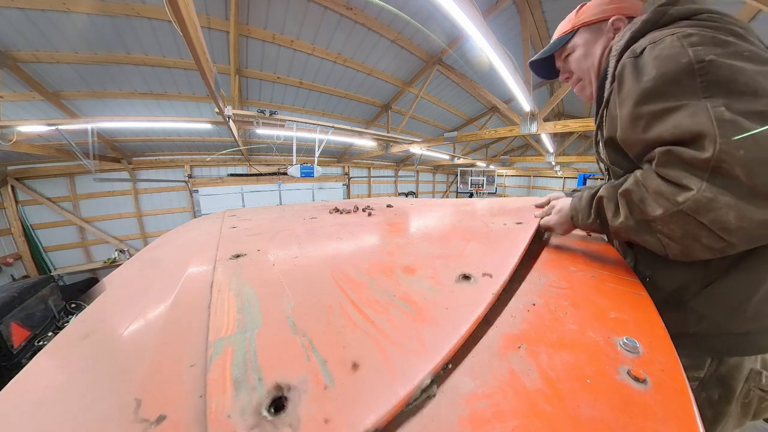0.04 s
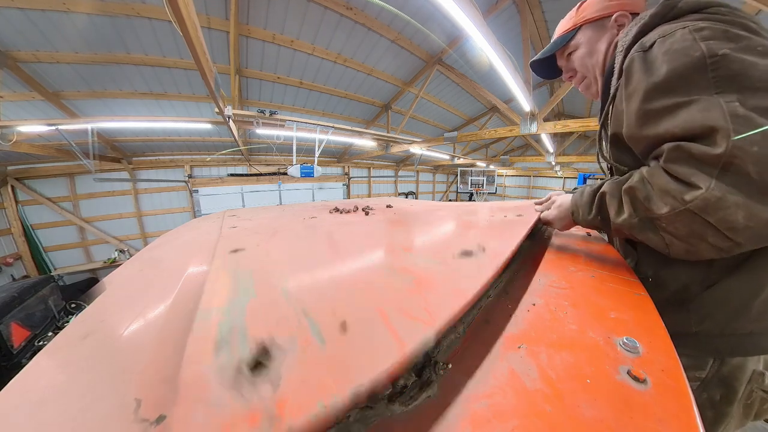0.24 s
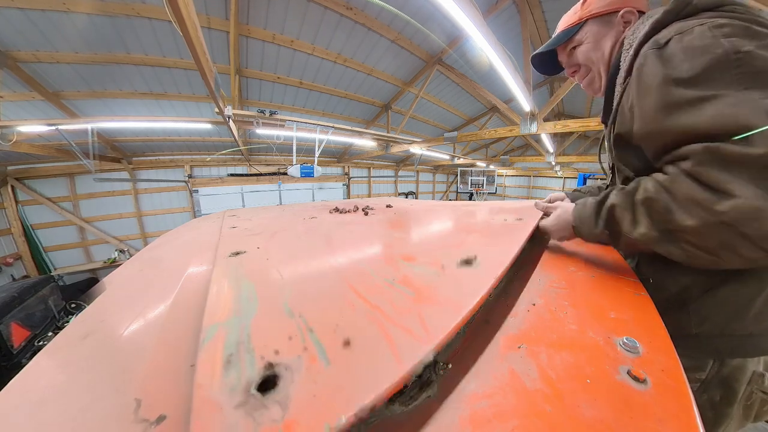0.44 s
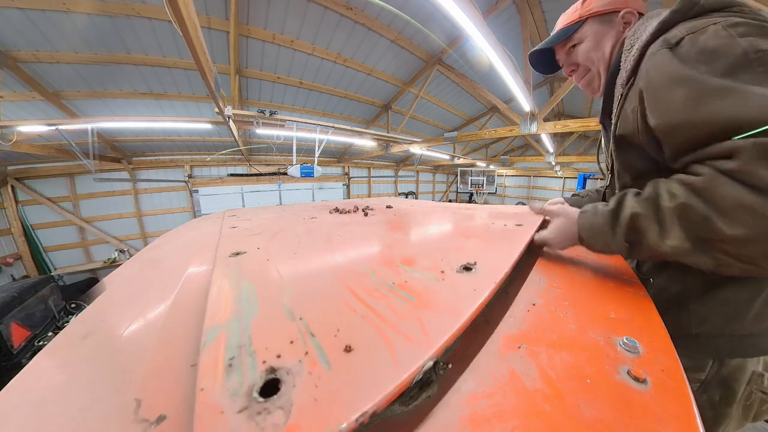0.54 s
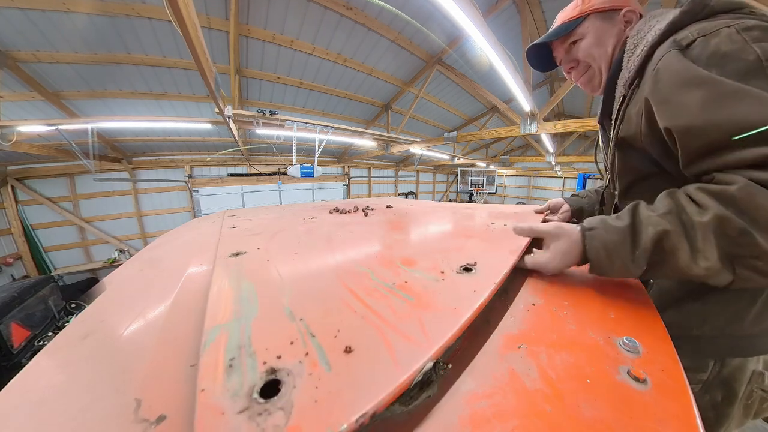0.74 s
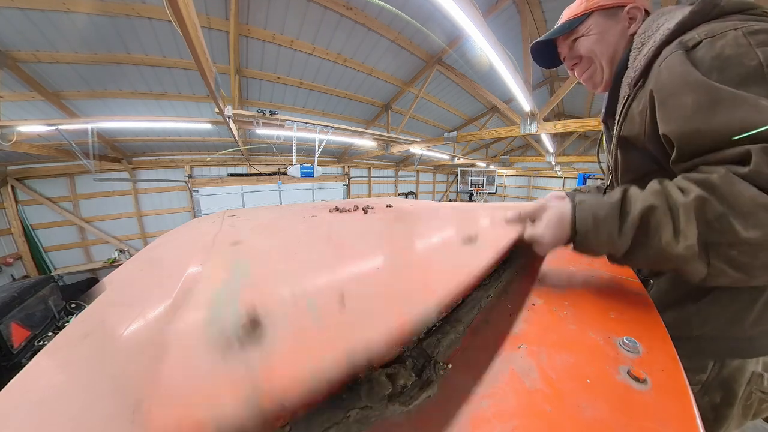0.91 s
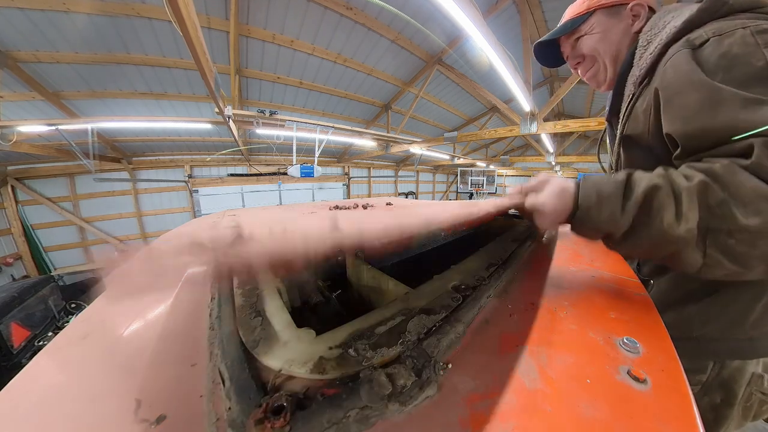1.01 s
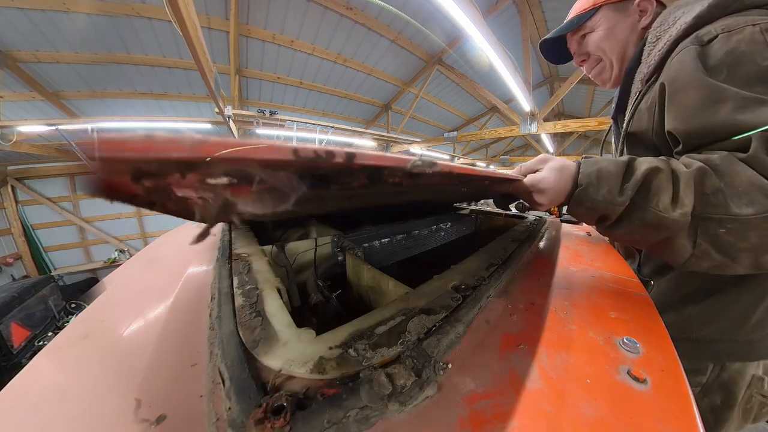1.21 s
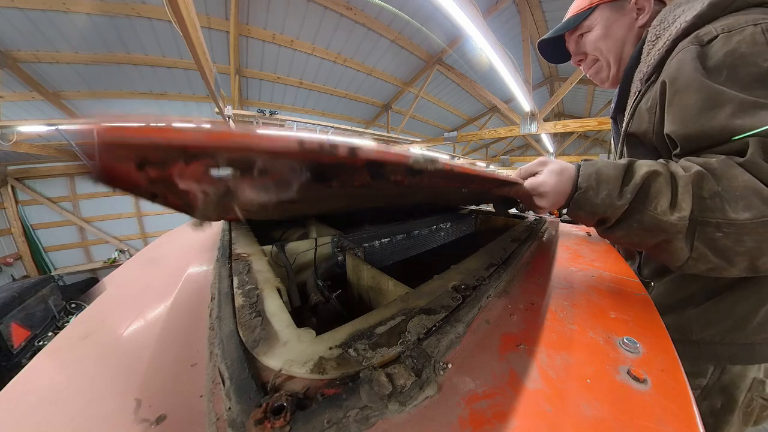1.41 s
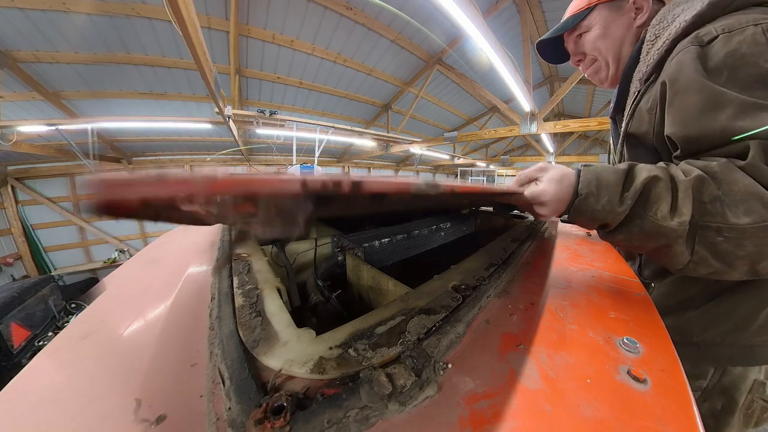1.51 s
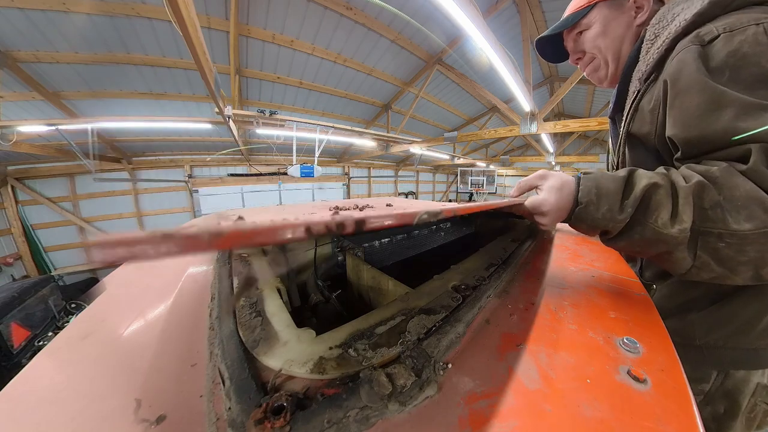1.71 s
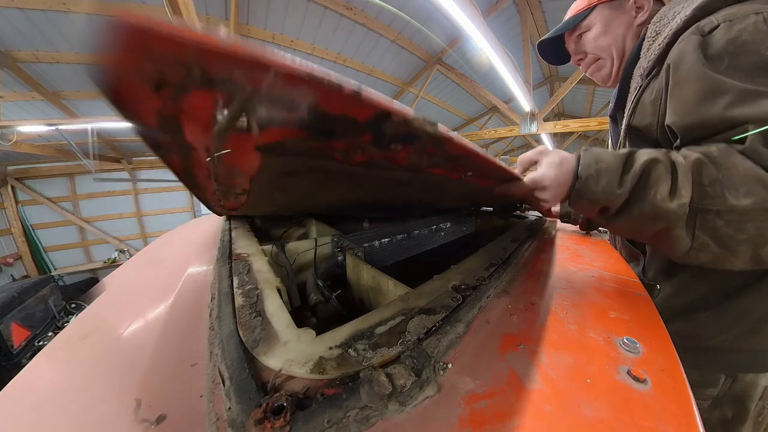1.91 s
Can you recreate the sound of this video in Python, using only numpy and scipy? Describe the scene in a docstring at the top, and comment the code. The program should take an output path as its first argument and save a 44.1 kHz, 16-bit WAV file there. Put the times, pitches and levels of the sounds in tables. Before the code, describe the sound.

A sheet-metal panel gives a faint creak, then breaks loose with a very loud, distorted crack and thump of air, scrapes and rattles on its seal, and wobbles low, close to the microphone in a large shed.

```python
"""Prying off a roof panel

A sheet-metal roof panel is pried off a tractor cab inside a large shed, close to the microphone.
It creaks, snaps loose in three cracks with a push of air, then scrapes and rattles along its seal.
Snaps are noise bursts that shake the panel's modes; buckles are sagging sines; rubbing is coloured noise.
The lifted panel hangs while its lowest modes beat and die away over the shed's hiss."""
import sys
import numpy as np
from scipy import signal
from scipy.fft import rfft, irfft
from scipy.io import wavfile
from scipy.ndimage import uniform_filter1d, minimum_filter1d

SR = 44100
rng = np.random.default_rng(int(sys.argv[2]) if len(sys.argv) > 2 else 0)


def unload_audio(sound):
    """Save the sound as a 16-bit wav file, at the path given as the first command line argument."""
    columns = np.transpose(np.atleast_2d(sound))
    # keep every value between -1 and 1, then stretch to whole-number steps
    steps = np.round(np.clip(columns, -1, 1) * 32767)
    wavfile.write(sys.argv[1], SR, steps.astype(np.int16))


def voltage_ratio(decibels):
    """Convert decibels (scalar or array-like) to amplitude ratios, 20 dB per decade."""
    exponent = np.asarray(decibels, float) / 20
    return 10 ** exponent


N = 85995  # length in samples


def rms_one(x):
    """Scale to unit rms."""
    return x / np.sqrt(np.mean(x ** 2) + 1e-20)


def in_time(rows):
    """Turn a curve of (time_s, level_db) into a gain for every sample."""
    time_s, level_db = np.transpose(rows)
    return voltage_ratio(np.interp(np.arange(N) / SR, time_s, level_db))


def coloured(x, spectrum):
    """Shape the spectrum by (pitch_hz, level_db), with almost nothing outside it; rms 1."""
    hz, db = np.transpose(spectrum)
    f = np.arange(N // 2 + 1) * SR / N + 1  # 1 Hz up, so that the log exists
    gain_db = np.interp(np.log(f), np.log(hz), db, left=-90, right=-90)
    return rms_one(irfft(rfft(x) * voltage_ratio(gain_db), N))


def drift(rate_hz):
    """Random wandering, mostly slower than rate_hz, with rms 1."""
    r = np.exp(-2 * np.pi * rate_hz / SR)
    white = rng.standard_normal(N + SR)  # the first second only settles the filter
    return rms_one(signal.lfilter([1], [1, -2 * r, r * r], white)[SR:])


def ring(clicks, hz, t60_s):
    """A resonance: a unit click sets a sine of height about 1 ringing, 60 dB down after t60_s."""
    r, w = voltage_ratio(-60 / (t60_s * SR)), 2 * np.pi * hz / SR
    return signal.lfilter([0, np.sin(w)], [1, -2 * r * np.cos(w), r * r], clicks + 1e-18)


# Colour of the hiss in the shed: pitch_hz, level_db (per Hz, relative)
SHED_COLOUR = [(20, -14.5), (40, -5), (100, -18.5), (200, -21.5), (260, -24), (330, 0.5), (600, -7),
               (1050, -0.5), (1400, -4.5), (2800, -7.5), (3600, -19), (4100, -32), (4700, -28.5),
               (5600, -33.5), (7300, -30.5), (8600, -41.5), (10000, -79)]
SHED_DB = -53


def shed_hiss():
    """Coloured noise whose level wavers by about 1 dB."""
    hiss = coloured(rng.standard_normal(N), SHED_COLOUR)
    return voltage_ratio(SHED_DB) * voltage_ratio(drift(46)) * hiss


# Loudness of the panel rubbing on its seal: time_s, level_db
SCRAPE_LEVEL = [(0, -55.5), (.065, -56), (.08, -48), (.15, -52), (.24, -46.5), (.3, -37.5), (.4, -39.5),
                (.55, -35.5), (.7, -35), (.87, -42), (1.03, -49.5), (1.3, -58), (1.48, -61.5),
                (1.54, -54.5), (1.62, -59.5), (1.77, -57), (1.87, -57.5), (1.95, -60.5)]
# Colour of the rubbing: pitch_hz, level_db (per Hz, relative)
SCRAPE_COLOUR = [(290, -31), (500, -0.5), (737, -3.5), (890, -9.5), (1230, -5.5), (1710, -13.5), (1960, -7),
                 (2190, -15), (2960, -7), (3530, -13.5), (4100, -15), (4710, -11), (5500, -18), (6700, -24),
                 (7780, -24.5), (8820, -31), (10000, -86), (13000, -105), (22000, -120)]
# Fine grit above 6 kHz against the rest of the scrape: time_s, level_db
GRIT = [(0, 0.5), (.25, 11), (.45, 7), (.7, -5), (.95, -7.5), (1.4, -1), (1.95, 2)]


def scrape():
    """Rubbing is dense uneven grains on a hiss; its finest grit swells, thins out and returns."""
    grains = rng.standard_normal(N) * (1 + 2.4 * (rng.random(N) < 0.03))
    rubbing = coloured(grains, SCRAPE_COLOUR)
    high = signal.butter(3, 6000, "high", fs=SR, output="sos")
    fine = signal.sosfiltfilt(high, rubbing)
    unsteady = voltage_ratio(-0.5 * drift(71))
    return in_time(SCRAPE_LEVEL) * unsteady * (rubbing + (in_time(GRIT) - 1) * fine)


# Loudness of the loose edge knocking on the frame: time_s, level_db
RATTLE_LEVEL = [(0, -83), (.065, -57.5), (.09, -44), (.16, -44.5), (.24, -31.5), (.3, -24.5), (.35, -34.5),
                (.43, -29.5), (.6, -30), (.69, -30.5), (.84, -35), (.95, -43.5), (1.15, -49.5),
                (1.4, -66.5), (1.6, -59), (1.72, -49.5), (1.8, -50.5), (1.87, -67), (1.95, -67.5)]
# Colour of the knocking: pitch_hz, level_db (per Hz, relative)
RATTLE_COLOUR = [(41, -19), (70, -3), (107, -1.5), (128, -5), (275, -2), (442, -7.5), (737, -30.5),
                 (891, -51.5), (1200, -30), (1560, -61.5), (2640, -120)]
KNOCKS_PER_S, KNOCK_SPREAD_DB = 800, 1.5
SWING_GATE = 0.25  # how much the swing changes the strength of the knocks


def rattle(shape):
    """Random knocks, stronger at the top of each swing, ring short low resonances."""
    sizes = voltage_ratio(KNOCK_SPREAD_DB * np.minimum(rng.exponential(1, N), 4))
    sizes = sizes * rng.choice([-1, 1], N)
    happens = rng.random(N) < KNOCKS_PER_S / SR
    knocks = sizes * happens * np.maximum(1 + SWING_GATE * shape, 0.05)
    pitches_hz = np.geomspace(70, 1200, 14)
    dealt = rng.integers(0, 14, N)  # each knock goes to one resonance
    rings = np.zeros(N)
    for k, hz in enumerate(pitches_hz):
        rings += ring(knocks * (dealt == k), hz, 12.7 / hz) * np.sqrt(hz)
    return in_time(RATTLE_LEVEL) * coloured(rings, RATTLE_COLOUR)


# Snaps of the sheet: start_s, level_db (peak), centre_hz, t60_s,
# ring_db (how strongly the panel rings, against the snap)
SNAPS = [(0.071, -33.5, 3280, 0.018, -4), (.071, -42, 600, 0.053, -32), (0.0701, -27.5, 7760, 0.022, -13.5),
         (0.217, -28.5, 1180, 0.015, -27), (.2220, -24.5, 1816, 0.0043, -14), (0.228, -37, 6030, 0.007, -9),
         (.2416, 10, 1500, .006, -16), (.2418, 9, 2700, .005, -30), (.2419, 8, 950, .012, -11),
         (.2426, 7, 2200, .006, -30), (.2419, -4, 6000, .008, -30), (0.245, -16, 5350, 0.055, -39),
         (.247, -15.5, 2410, 0.064, -20), (.2525, -12, 1120, 0.013, -13.5),
         (0.2538, -14.5, 1900, 0.025, -26), (.262, -14, 880, 0.012, -27),
         (0.2596, -9.5, 5400, 0.015, -33.5), (0.2623, -14, 5650, 0.0084, -19),
         (0.2793, -3.5, 5660, 0.015, -13), (0.2786, -8.5, 3300, 0.031, -23),
         (.28, -11.5, 946, 0.016, -22.5), (0.284, -16.5, 3480, 0.034, -11), (0.332, -29, 5600, 0.033, -19),
         (0.378, -22.5, 2100, 0.01, -18), (0.409, -29, 4900, 0.045, -43), (.4405, -22, 950, 0.059, -15),
         (.4405, -28, 2300, .03, -20.5), (.411, -30.5, 1700, .02, -21), (.839, -24.5, 2100, 0.028, -28),
         (.8395, -26.5, 3840, 0.033, -16), (0.841, -33, 5500, 0.014, -11), (1.058, -50, 6500, 0.0092, -20)]
# Modes of the panel: pitch_hz, level_db (relative), t60_s
PANEL = [(200, -16, 0.06), (281.3, -3.5, 0.11), (404, 3.5, 0.091), (456, 0, 0.059), (600, 8.5, 0.041),
         (670, -5, 0.049), (925, -20, 0.04), (950, -7.5, 0.041), (1020, 7.5, 0.035), (1240, -1, 0.0057),
         (1590, -4.5, 0.029), (1766, -4.5, 0.017), (2430, 9, 0.0071), (2790, 1, 0.013), (2900, -11, 0.034)]
SNAP_OCTAVES = 1.3  # width of the noise band
BEND_SHARE = 0.062  # the bent sheet detunes its modes from snap to snap by up to this share
SHUDDER_T60_S = 0.012  # how long a snap shakes the modes


def snaps():
    """Each snap is a dying burst of noise around its centre, and a short shudder that rings the panel."""
    length = 4410
    t = np.arange(length) / SR
    out = np.zeros(N + SR)
    for start_s, level_db, centre_hz, t60_s, ring_db in SNAPS:
        white = rng.standard_normal(length)
        edges = centre_hz * 2 ** (np.array([-0.5, 0.5]) * SNAP_OCTAVES)
        edges = np.clip(edges, 50, 0.45 * SR)
        burst = white * voltage_ratio(-60 * t / t60_s) + 4.0 * (t == 0)  # a click leads the noise
        band = signal.sosfilt(signal.butter(3, edges, "band", fs=SR, output="sos"), burst)
        shudder = white[::-1] * voltage_ratio(-60 * t / SHUDDER_T60_S)
        shudder = shudder / np.sqrt(np.sum(shudder ** 2))
        body = np.zeros(length)
        for mode_hz, mode_db, mode_t60_s in PANEL:
            uneven_db = rng.normal(0, 3.3)  # every snap excites the modes differently
            bend = 1 + BEND_SHARE * rng.uniform(-0.91, 1)
            body += voltage_ratio(mode_db + uneven_db) * ring(shudder, mode_hz * bend, mode_t60_s) / 2
        i = int(start_s * SR)
        out[i:i + length] += voltage_ratio(level_db) * (band / abs(band).max() + voltage_ratio(ring_db) * body)
    return out[:N]


ECHO_DB, ECHO_T60_S = -29, 0.14


def shed_echo(x):
    """The shed answers with a diffuse tail of dying noise, starting after 4 ms."""
    t = np.arange(SR // 2) / SR
    tail = rng.standard_normal(len(t)) * voltage_ratio(-60 * t / ECHO_T60_S) * (t > 0.004)
    tail = tail / np.sqrt(np.sum(tail ** 2))
    return voltage_ratio(ECHO_DB) * signal.fftconvolve(x, tail)[:N]


# The sheet buckles and pushes air: start_s, level_db, pitch_hz (at the start), t60_s
BUCKLES = [(0.074, -28.5, 233, 0.036), (0.175, -26, 113, 0.055), (0.182, -16.5, 178, 0.034),
           (0.226, -35, 300, 0.036), (0.2417, -3.5, 254, 0.028), (0.2421, 3, 396, 0.0279),
           (0.2492, -4, 111, 0.021), (0.2689, -8.5, 200, 0.011), (0.26, 4.5, 157.3, 0.0156),
           (0.2798, 4, 155, 0.034), (0.29, 0, 45.1, 0.056), (0.439, -20, 250, 0.017),
           (0.4456, -20, 185, 0.027), (0.455, -16, 232, 0.028), (0.46, -23, 130, .04),
           (0.587, -18, 172, 0.093), (1.937, -38, 99.6, 0.18)]
SAG_S = 0.014  # the pitch of a buckle has halved after this time


def buckles():
    """Each buckle is a low, heavily damped swing of pressure whose pitch sags."""
    t = np.arange(SR // 5) / SR
    out = np.zeros(N + SR)
    for start_s, level_db, hz, t60_s in BUCKLES:
        cycles = hz * SAG_S * np.log1p(t / SAG_S)
        i = int(start_s * SR)
        out[i:i + len(t)] += voltage_ratio(level_db - 60 * t / t60_s) * np.sin(2 * np.pi * cycles)
    return out[:N]


# Lowest modes of the panel: pitch_hz, level_db (relative, when in step),
# loss_db_per_s (on top of the swing's own curve; negative gains on it)
SWING_MODES = [(49.5, 0, 0), (57.2, -9, -1.5), (44.6, -19, -2)]
IN_STEP_S = 0.649  # all the modes peak together at this time


def swing_shape():
    """The lowest modes beat against each other; height about 1."""
    t = np.arange(N) / SR - IN_STEP_S
    shape = np.zeros(N)
    for hz, level_db, loss_db_per_s in SWING_MODES:
        shape += voltage_ratio(level_db - loss_db_per_s * t) * np.cos(2 * np.pi * hz * t)
    return shape


# Loudness of the whole panel swinging: time_s, level_db
SWING_LEVEL = [(.08, -55), (.11, -52), (.22, -33), (.33, -55), (.41, -30), (.52, -34), (.62, -23),
               (.8, -23), (1.3, -29), (1.6, -36.5), (1.8, -38.5), (1.9, -49), (1.95, -54.5)]


def swing(shape):
    """The whole panel sways in its lowest modes, building up and dying away."""
    return in_time(SWING_LEVEL) * shape


# Short soft swells of the panel: the crack's ring, a clank, hollow shifts and high squeaks:
# start_s, length_s, level_db, pitch_hz
SWELLS = [(.1, .05, -51, 466), (0.25, .012, -16.5, 1020), (.376, 0.006, -27.5, 2000),
          (0.44, 0.021, -32, 974), (1.131, 0.012, -56, 8000), (1.518, 0.076, -65.5, 7000),
          (1.748, 0.045, -64.5, 7200), (1.018, 0.09, -42.5, 144), (1.181, 0.077, -43.5, 124),
          (1.239, 0.084, -48, 600), (1.26, 0.023, -66, 340), (1.273, 0.15, -45.5, 127.5),
          (1.422, 0.069, -52.5, 315), (1.707, 0.085, -59, 200), (1.502, 0.064, -62.5, 4330),
          (1.743, 0.079, -62.5, 5050)]
SWELL_CYCLES = 5  # the resonance dies by 60 dB in this many cycles


def swells():
    """Each ring, clank, shift or squeak is a smooth swell of noise in one broad resonance."""
    t, noise = np.arange(N) / SR, rng.standard_normal(N)
    out = np.zeros(N)
    for start_s, length_s, level_db, hz in SWELLS:
        rise_and_fall = np.sin(np.pi * np.clip((t - start_s) / length_s, 0, 1)) ** 2
        t60_s = SWELL_CYCLES / hz
        tone = ring(ring(noise, hz, t60_s), hz, t60_s)  # twice, for steeper sides
        out += voltage_ratio(level_db) * rise_and_fall * rms_one(tone)
    return out


# The edge slaps the frame at the top of each swing: time_s, level_db (relative)
SLAP_LEVEL = [(.56, -62), (.59, -35), (.69, -12), (.74, -15.5), (.85, -41.5), (1.1, -44.5), (1.3, -73)]
SLAP_SHARPNESS = 3.7  # a higher power makes a narrower push


def slaps(shape):
    """The edge meets the frame with one short push per swing."""
    push = np.maximum(shape / 1.33, 0) ** SLAP_SHARPNESS
    high = signal.butter(2, 70, "high", fs=SR, output="sos")
    return in_time(SLAP_LEVEL) * 2 * signal.sosfiltfilt(high, push)


SIDE_DB, SIDE_LOW_HZ, SIDE_HIGH_HZ = -6, 2724, 7780


def scene():
    """Direct sound is alike in both channels; the upper mids of the diffuse sound differ between them."""
    shape, hits = swing_shape(), snaps()
    diffuse = shed_hiss() + scrape() + shed_echo(hits)
    direct = hits + rattle(shape) + buckles() + swing(shape) + swells() + slaps(shape)
    mid = direct + diffuse
    scatter = rng.standard_normal(400) / 20  # about 9 ms of random smearing
    upper_mids = signal.cheby2(8, 70, [SIDE_LOW_HZ, SIDE_HIGH_HZ], "band", fs=SR, output="sos")
    side = signal.sosfilt(upper_mids, signal.lfilter(scatter, 1, diffuse))
    return mid + voltage_ratio(SIDE_DB) * side * [[1], [-1]]


def band_limit(x):
    """A steep low-pass at the top of the band."""
    return signal.sosfilt(signal.butter(12, 16480, fs=SR, output="sos"), x)


MIC_LOW_HZ, MIC_HIGH_HZ, CUTOFF_HZ = 38, 10200, 16400
CEILING_DB, RELEASE_DB_PER_S, AHEAD_S = 7, 456, 0.0048


def record(dry):
    """Bass and top cut; a look-ahead limiter ducks around the cracks, what is left clips."""
    x = signal.sosfilt(signal.butter(2, MIC_LOW_HZ, "high", fs=SR, output="sos"), dry)
    x = signal.sosfilt(signal.cheby2(8, 50, MIC_HIGH_HZ, fs=SR, output="sos"), x)
    over_db = np.maximum(20 * np.log10(abs(x).max(axis=0) + 1e-9) - CEILING_DB, 0)
    ramp_db = RELEASE_DB_PER_S * np.arange(N) / SR
    held_db = np.maximum.accumulate(over_db + ramp_db) - ramp_db  # lets go at a steady rate
    ahead = max(int(AHEAD_S * SR), 2)
    early_db = -minimum_filter1d(-held_db, 2 * ahead)  # starts before the peak
    ducked = x * voltage_ratio(-uniform_filter1d(early_db, ahead))
    clipped = np.clip(ducked, -1, 1)
    mix = signal.sosfilt(signal.cheby2(10, 60, CUTOFF_HZ, fs=SR, output="sos"), clipped)
    return band_limit(mix)


dry = scene()
out = record(dry)
unload_audio(out)
```